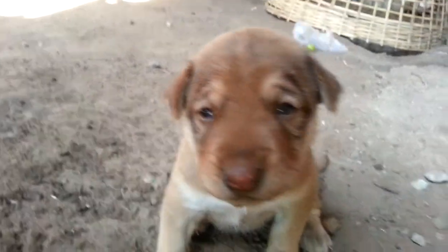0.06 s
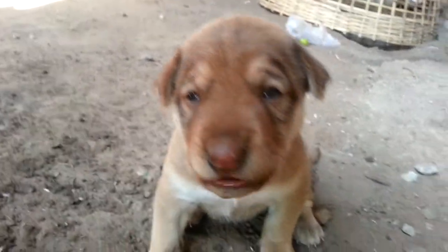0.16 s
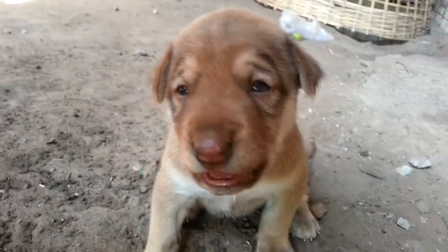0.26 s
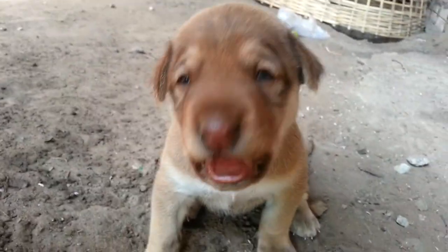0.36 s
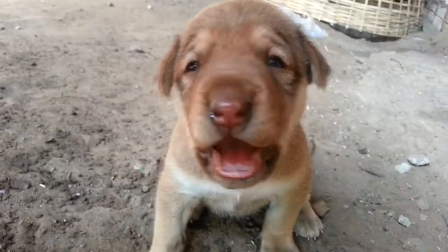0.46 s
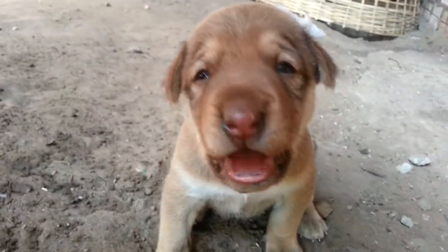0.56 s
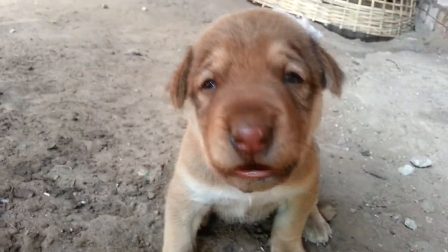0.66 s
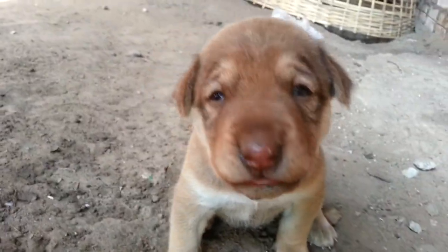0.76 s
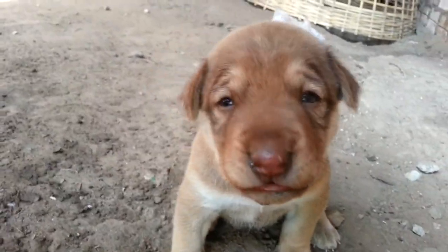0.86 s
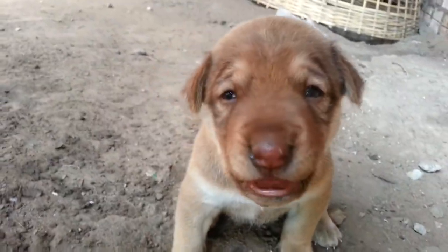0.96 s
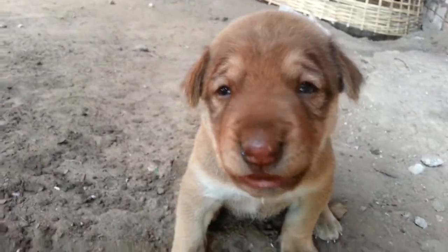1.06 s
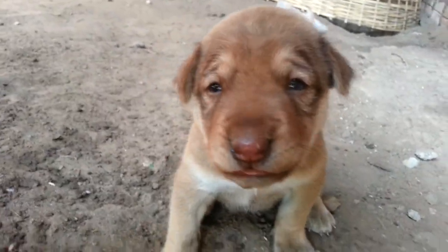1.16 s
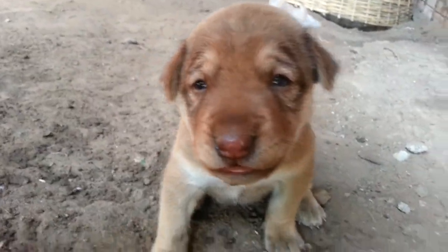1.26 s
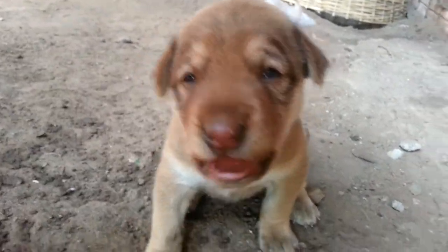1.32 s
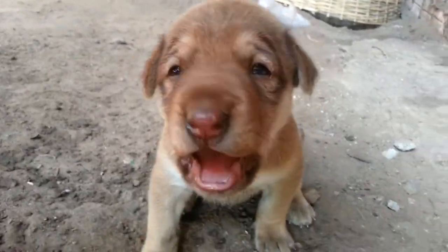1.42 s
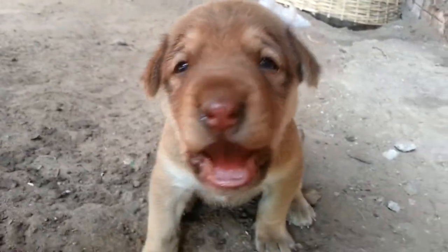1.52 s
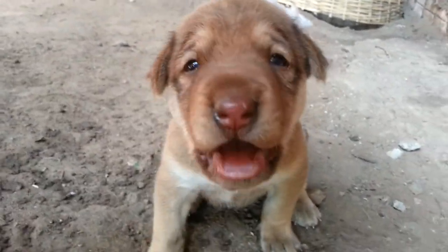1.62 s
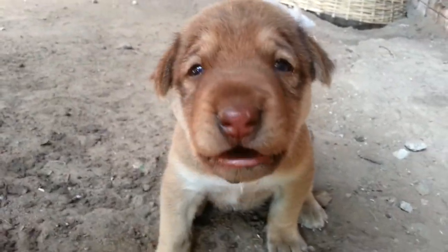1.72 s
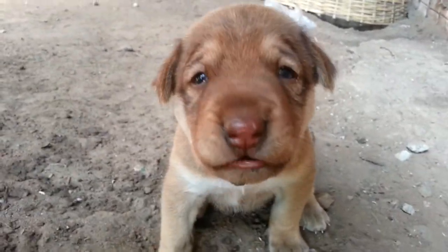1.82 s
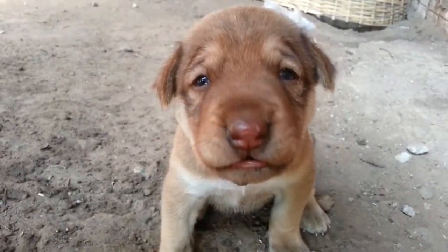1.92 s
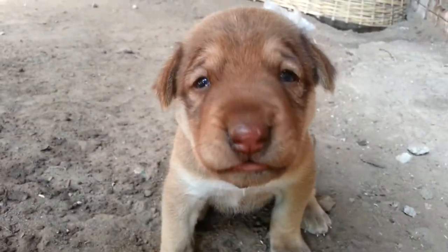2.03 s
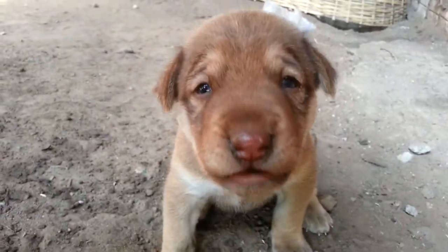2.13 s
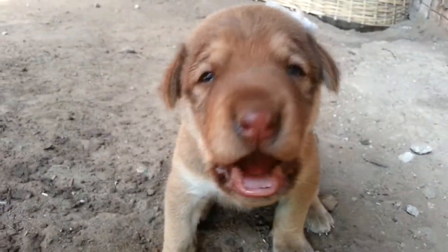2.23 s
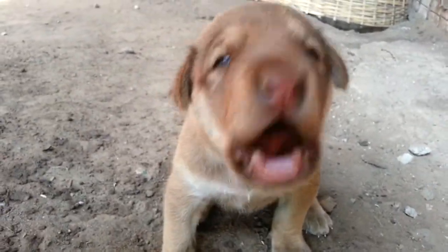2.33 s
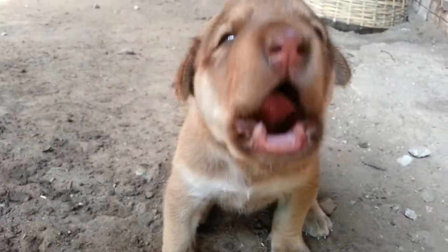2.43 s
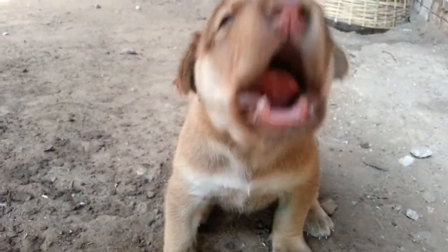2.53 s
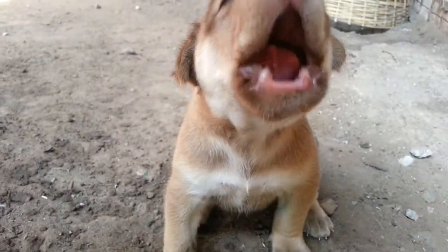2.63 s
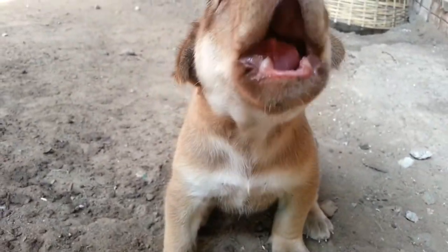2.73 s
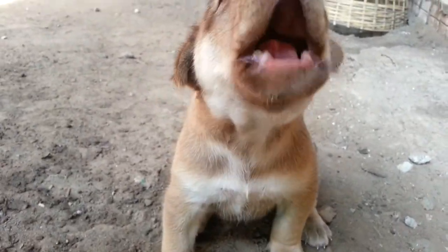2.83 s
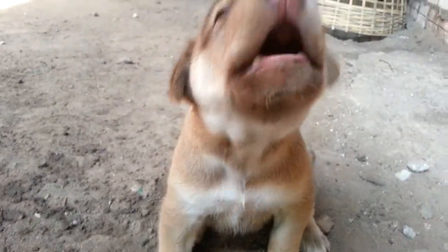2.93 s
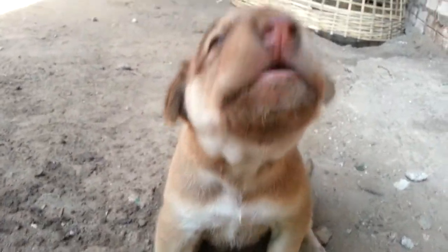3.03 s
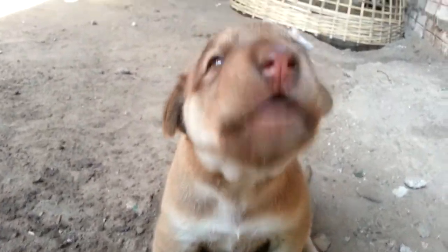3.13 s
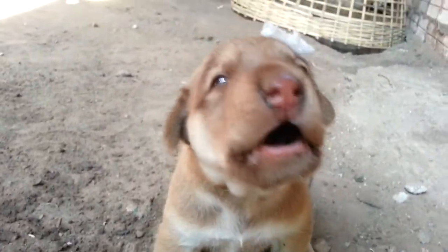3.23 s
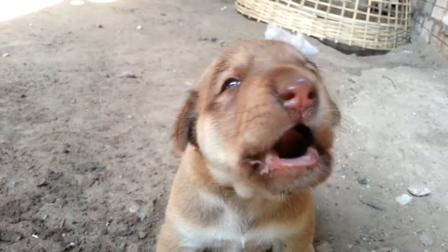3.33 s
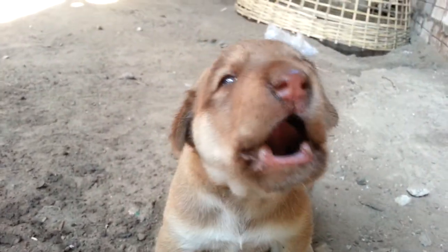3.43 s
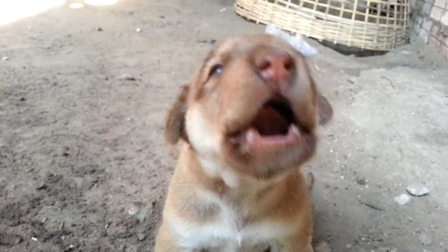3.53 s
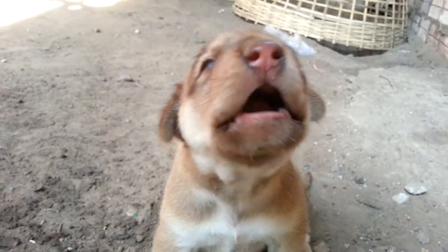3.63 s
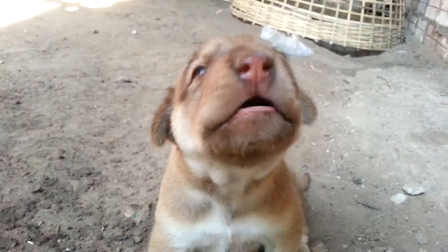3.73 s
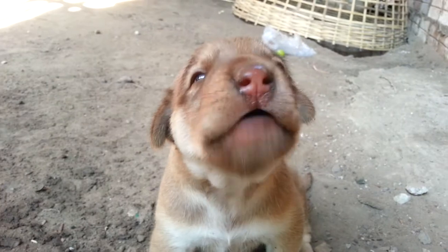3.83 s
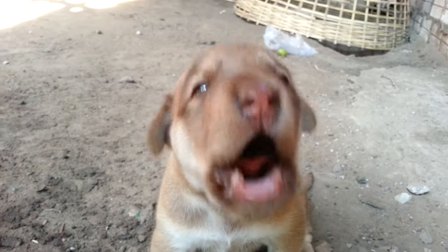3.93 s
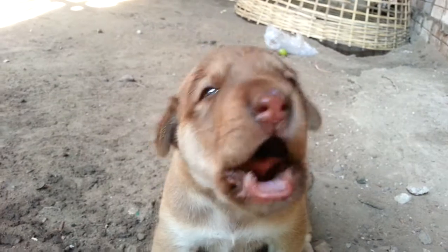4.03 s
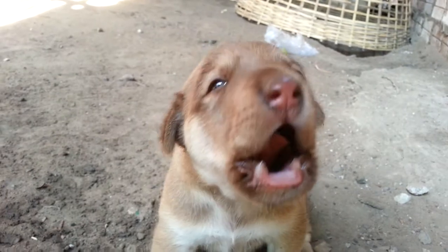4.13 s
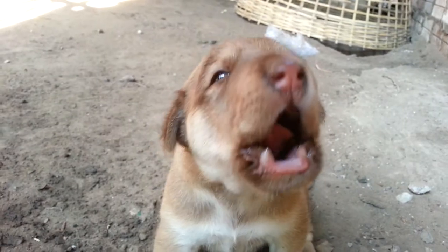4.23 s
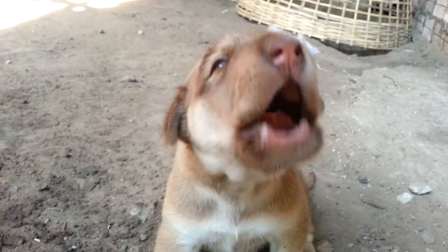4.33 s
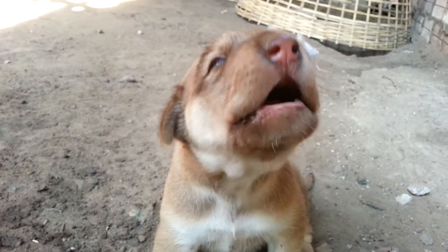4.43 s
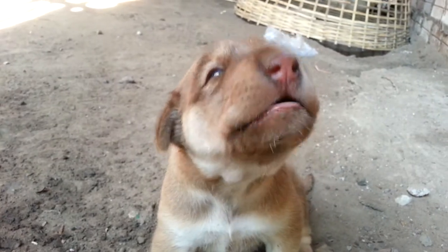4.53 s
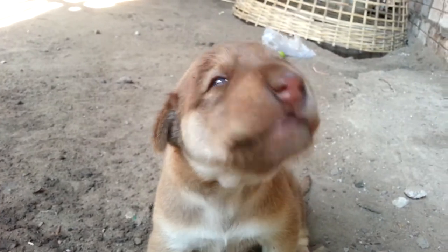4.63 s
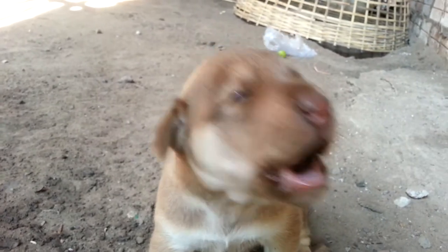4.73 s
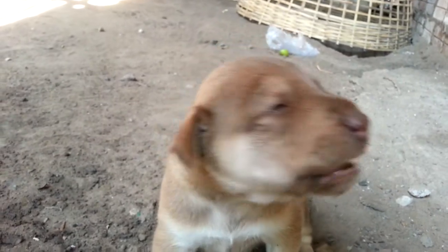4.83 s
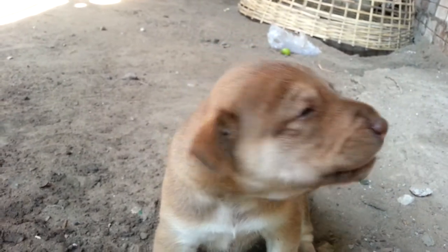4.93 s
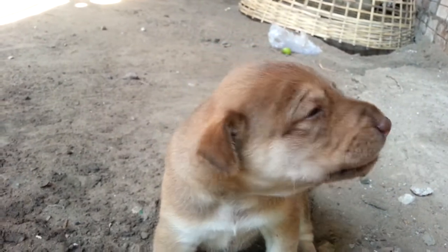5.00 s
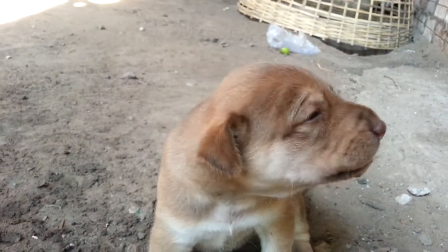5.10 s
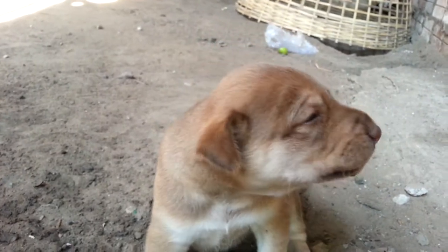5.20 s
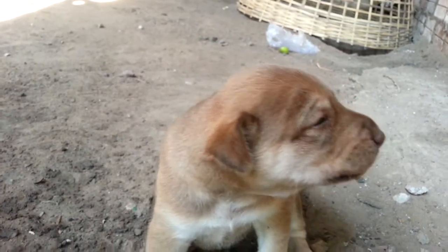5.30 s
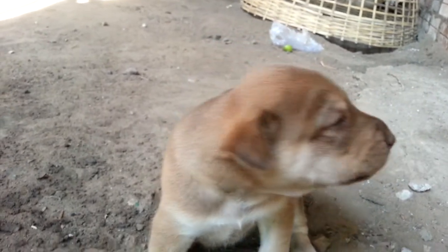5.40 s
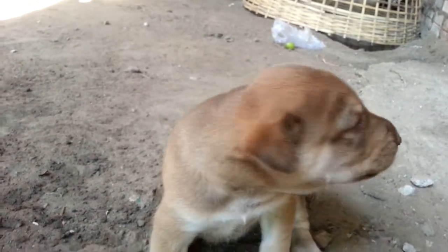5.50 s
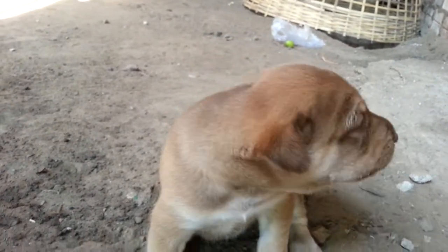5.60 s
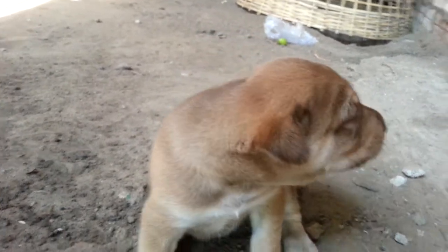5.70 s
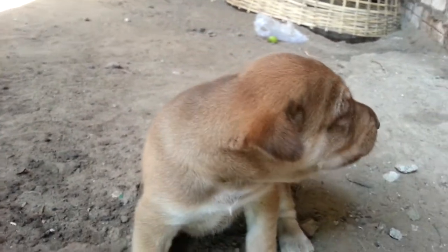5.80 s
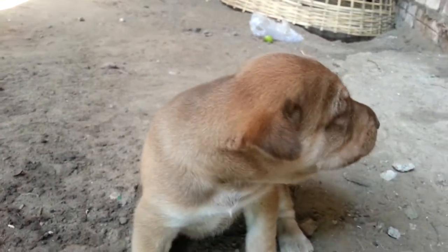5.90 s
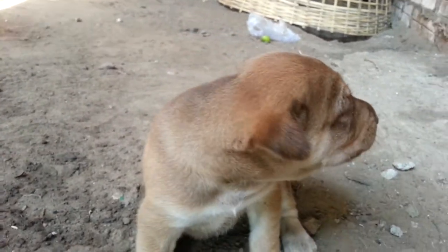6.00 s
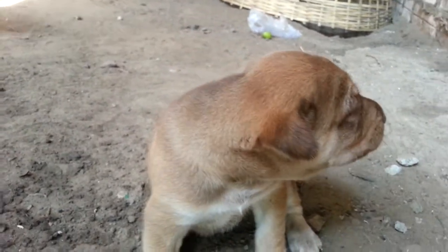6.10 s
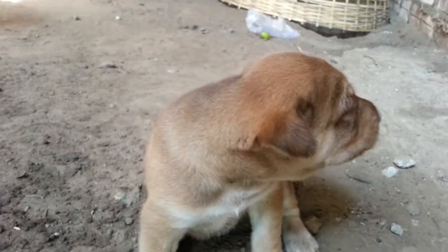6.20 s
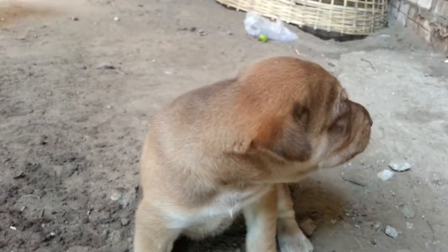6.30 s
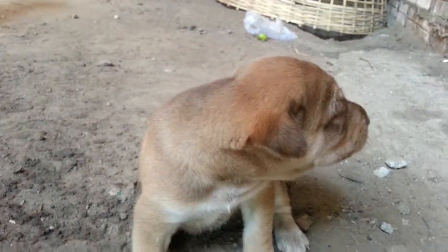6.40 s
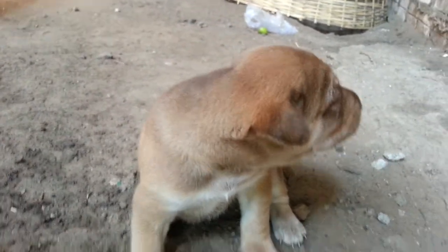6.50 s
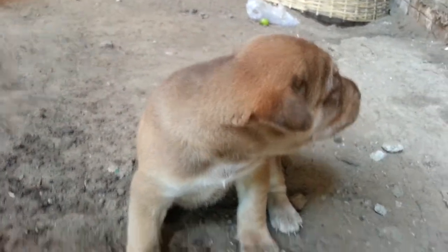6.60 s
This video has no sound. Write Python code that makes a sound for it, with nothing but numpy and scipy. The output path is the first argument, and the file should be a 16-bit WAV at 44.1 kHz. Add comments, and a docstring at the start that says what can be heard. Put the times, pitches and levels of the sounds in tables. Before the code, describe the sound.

A steady airy hiss and a thin, far-off machine whine run throughout, in a small walled yard. Close to the stereo microphone a young puppy begins crying at 0.2 s: a wobbling yelp that rises, cracks and trembles until 0.7. A short lower yip comes at 1.0, then a sharp squeal at 1.4 that jumps high and sags, rough and quivering, to 1.8. At 2.2 a loud piercing yelp stretches into a high, nearly level howl until 3.0. A lower, nasal, slightly trembling whine follows from 3.2 to 3.7. At 3.9 a strident yelp leaps up, drops, and climbs again to 4.5; a quick falling yelp at 4.7 ends by 5.0. Loud attacks distort, breath puffs thump the microphone, and faint echoes trail each cry. Then quiet hiss and whine, with one tiny low closed-mouth grunt near 5.5, until about 6.5.

```python
"""Under the hiss of the air in a walled yard a machine whines far away, from start to end.
Close to a two-port microphone a puppy yelps and howls seven times: fold pulses and breath ring in chest,
mouth, throat and head. The walls answer with sparse echoes, puffs of its breath rumble on the ports and
the loud starts overload the recorder. Last comes a tiny grunt, a few low closed-mouth cycles."""
import sys
import numpy as np
from scipy import signal
from scipy.fft import rfft, irfft, next_fast_len
from scipy.io import wavfile
from scipy.ndimage import uniform_filter1d

SR = 44100
rng = np.random.default_rng(int(sys.argv[2]) if len(sys.argv) > 2 else 0)


def generate_wav(signal):
    """Clip the signal to [-1, 1] and save it as 16-bit WAV at the path in sys.argv[1]."""
    frames = np.transpose(np.atleast_2d(signal))
    scaled = np.clip(frames, -1, 1) * 32767
    pcm = np.round(scaled).astype(np.int16)
    wavfile.write(sys.argv[1], SR, pcm)


N = 293294


def amp(db):
    """Gain from dB."""
    return 10 ** (np.asarray(db) / 20)


def evened(x):
    """Scales to rms 1."""
    return x / np.sqrt(np.mean(x ** 2) + 1e-20)


def read(points, hz):
    """Value of a (Hz, value) table on a log-frequency axis."""
    f, value = np.transpose(points)
    return np.interp(np.log(hz + 1), np.log(f + 1), value)


def add(mix, s, sound):
    """Mixes a sound in at s seconds."""
    part = mix[..., round(s * SR):][..., :sound.shape[-1]]
    part += sound[..., :part.shape[-1]]


def resonate(x, hz, width):
    """Shifts the curve hz down to zero, smooths, and shifts back: a resonance of gain 1."""
    turn = np.exp(2j * np.pi * np.cumsum(hz * np.ones(len(x))) / SR)
    r = np.exp(-np.pi * width / SR)
    return 2 * (turn * signal.lfilter([1 - r], [1, -r], x / turn)).real


def steep(x, hz, width):
    """A resonance with steep skirts, from four stages of which width is the narrowest."""
    for wider in (1, 2, 2.5, 3):
        x = resonate(x, hz, wider * width)
    return x


def air():
    """Hiss of the air: random short-time spectra with faint drifting patches, partly alike at both ports."""
    # Colour of the hiss. Each row: frequency in Hz, relative level in dB per Hz.
    colour = [(18, -85.5), (30, -90), (151, 1.5), (516, -11), (573, -11), (687, -13), (1350, -9.5),
              (1460, -7.5), (1630, -16), (2060, -3), (2960, -20.5), (3290, -11.5), (5840, -27),
              (13800, -25.5), (15300, -43.5)]
    # Likeness of the two ports. Each row: frequency in Hz, left-right correlation from -1 to 1.
    likeness = [(60, 0.64), (180, 0.96), (540, 0.4), (1640, -0.091), (4940, 0.022), (14900, -0.047)]
    # Balance of the two ports. Each row: frequency in Hz, left over right in dB.
    balance = [(60, 4), (150, 0), (380, 2.5), (950, -3), (2370, -2), (5940, 7.5), (14900, -3.5)]
    level_db = -45
    frames, hz = N // 256 + 5, np.fft.rfftfreq(1024, 1 / SR)
    a, b, c, d, patches = rng.standard_normal((frames, 513, 5)).T
    patches = uniform_filter1d(patches, size=10, axis=0)
    patches = evened(uniform_filter1d(patches, size=14, axis=1))
    same = np.clip(read(likeness, hz), -1, 1)[:, None]
    left = a + 1j * b
    right = same * left + np.sqrt(1 - same ** 2) * (c + 1j * d)
    spectra = np.array([left, right]) * amp(read(colour, hz)[:, None] + 0.5 * patches)
    lean = amp(read(balance, hz) / 2)[:, None]
    hiss = signal.istft(spectra * [lean, 1 / lean], nperseg=1024, noverlap=768)[1][:, :N]
    return amp(level_db) * evened(hiss)


def machine():
    """Whine of the far machine: noise through narrow resonances, separate noise at each port."""
    # Fuzzy lines. Each row: frequency in Hz, width of the narrower of two stages in Hz, level in dB.
    lines = [(1484, 8, -58), (1912, 12, -53), (2090, 12, -54), (2596, 16, -63), (3290, 100, -58),
             (4270, 14, -69)]

    def whine(noise):
        return sum(amp(db) * evened(resonate(resonate(noise, hz, width), hz, 2 * width))
                   for hz, width, db in lines)

    return np.array([whine(noise) for noise in rng.standard_normal((2, N))])


def tremble(t):
    """Pitch change in % from the trembling stretches, each fading in and out."""
    # Each row: first crest in seconds, end in seconds, rate in Hz, pitch depth in %.
    stretches = [(0.365, 0.409, 74, 4), (0.504, 0.573, 21.7, 5.8), (.588, 0.718, 22, 4.5),
                 (1.46, 1.537, 23.5, 6.24), (1.541, 1.637, 22.5, 6), (2.4, 2.425, 26.3, 10),
                 (3.424, 3.73, 25, 1.65), (4.048, 4.178, 19.8, 1.7), (4.224, 4.293, 18, 1.9)]
    snap = 1.5  # how abruptly a tremble flips between its high and low side
    first, end, rate_hz, depth = np.transpose(stretches)
    t = t[:, None]
    fade = np.clip(np.minimum((t - first) * rate_hz * 2 + 1, (end - t) * rate_hz * 2), 0, 1)
    wave = np.tanh(snap * np.cos(2 * np.pi * rate_hz * (t - first))) / np.tanh(snap)
    return (fade * wave) @ depth


ONSET_S, ENDING_S = .04, .025  # rough, breathy ends of every cry


def folds(t, hz):
    """One sharp pulse per turn; where the folds falter, pulses alternate, scatter and nearly fail."""
    # Unsteady folds. Each row: start in seconds, end in seconds, strong-weak share, scatter of pulse size
    # (about its rms share), share of pulses that nearly fail.
    rough = [(.36, .44, .04, .08, 0), (1.43, 1.475, .25, .2, 0), (1.635, 1.665, .7, .3, .1),
             (1.665, 1.74, .5, .6, .4), (2.262, 2.284, .3, .5, .1), (2.284, 2.325, .13, .1, 0),
             (3.965, 4.02, .2, .4, .05), (4.775, 4.82, .1, .25, 0)]
    # the same three shares at both ends of every cry
    ends = [(t[0], t[0] + ONSET_S, 0, .1, 0), (t[-1] - ENDING_S, t[-1], .15, .22, .05)]
    turns = np.cumsum(hz) / SR
    start = np.flatnonzero(np.diff(np.floor(turns))) + 1
    late = (turns[start] % 1) * SR / hz[start]  # part of a sample, so the pulses sit between samples
    count = len(start)
    chance, size, slip = rng.random((count, 3)).T, np.ones(count), np.zeros(count, int)
    for t0, t1, alternate, scatter, fail in ends + rough:
        inside = (t[start] >= t0) & (t[start] < t1)
        varied = 1 + alternate * (-1) ** np.arange(count)
        varied = varied * (1 + scatter * 3.14 * (chance[0] - .5))
        size = np.where(inside, varied * np.where(chance[1] < fail, .3, 1), size)
        slip[inside] = (scatter ** 2 * chance[2] * SR / hz[start])[inside]  # uneven pulses also come late
    lag, out = np.arange(-12, 13), np.zeros(len(t) + 99)
    x = lag + late[:, None]
    shape = np.sinc(.8 * x) * (1 + np.cos(np.pi * x / 13))
    np.add.at(out, (start + slip)[:, None] + lag + 12, size[:, None] * shape)
    return out[12:][:len(t)] * np.sqrt(SR / hz) / 2, turns


def head(drive, hiss, pose_db):
    """Treble resonances of the head, of alternating sign, each with its own random slow change of level."""
    # Each row: frequency in Hz, width of the narrowest stage in Hz.
    modes = [(3800, 596), (4800, 630), (6900, 1470), (9200, 1270), (11700, 1540)]
    drift = uniform_filter1d(rng.standard_normal((len(modes), len(drive))), size=2000)
    drift_db = 4.5 * evened(uniform_filter1d(drift, size=1200))
    source = drive + 0.044 * hiss
    return sum((-1) ** k * amp(pose_db[k] + drift_db[k]) * steep(source, *mode)
               for k, mode in enumerate(modes))


def catches(t):
    """Level change in dB where the voice catches for an instant, a smooth bump each time."""
    # Each row: middle in seconds, level change in dB.
    moments = [(.213, -5), (.291, -1.5), (.379, -7.5), (0.428, -6), (.556, -7), (0.588, -4), (1.505, -3),
               (2.338, 1), (2.364, -2), (2.402, -6), (2.4327, -1.5), (2.464, -8), (3.497, -3),
               (4.223, -0.5), (4.879, -5)]
    at, change_db = np.transpose(moments)
    return np.exp(-.5 * ((t[:, None] - at) / 0.0046) ** 2) @ change_db  # 4.6 ms: standard deviation


def cry(rows, lift_db, stretch, pose_db):
    """Fold pulses and breath pass chest, mouth, throat and head."""
    # resonances: Hz, width of the narrowest stage in Hz
    chest, mouth, throat = (866, 684), (1985, 509), (2910, 482)
    breath_base, breath_ends = .11, .35  # the breath's gain is the square of their sum
    tremble_db = 0.1543  # level change for each % of pitch
    ring = 0.34  # share of the swell kept when a harmonic crosses the mouth resonance
    s, hz, *columns = np.transpose(rows)
    t = np.arange(s[0], s[-1], 1 / SR)
    level_db, opening, throat_db = (np.interp(t, s, c) for c in columns)
    hz = uniform_filter1d(np.exp(np.interp(t, s, np.log(hz))), size=220, mode="nearest")

    # The chest fades by 18 dB an octave and as the level rises; the treble follows the upper voice.
    chest_db = lift_db - 17 - 18 * np.log2(hz / 550) - 0.76 * (level_db + 4.5)
    treble_db = -19 + 0.44 * throat_db
    both_ends = np.exp((s[0] - t) / ONSET_S) + np.exp((t - s[-1]) / ENDING_S)
    breath = breath_base + breath_ends * both_ends

    shake = tremble(t)
    level_db = level_db + catches(t) + tremble_db * shake
    jitter = evened(uniform_filter1d(rng.standard_normal(len(t)), size=120))
    waver = uniform_filter1d(rng.standard_normal(len(t)), size=900)
    waver = evened(uniform_filter1d(waver, size=600))  # slow wandering of the pitch
    hz = hz * np.exp(shake / 100) * (1 + .002 * jitter) * (1 + .004 * waver)

    pulses, turns = folds(t, hz)
    # air leaks while the folds are open
    hiss = (.4 + np.exp(-(turns % 1) / .3)) * rng.standard_normal(len(t))
    drive = pulses + breath ** 2 * hiss
    upper = amp(throat_db) * steep(drive, stretch * throat[0], throat[1])
    treble = amp(treble_db) * head(drive, hiss, pose_db)
    body = amp(chest_db) * steep(drive, *chest)
    voice = steep(drive, mouth[0] * opening, mouth[1]) - body - upper + treble
    voice = signal.sosfilt(signal.butter(2, 280, "high", fs=SR, output="sos"), voice)

    # Even out the loudness, then give back a share of its swell.
    power = signal.oaconvolve(voice ** 2, np.hanning(601) / 300, "same")
    loudness = np.sqrt(power.clip(1e-6))
    swell = (loudness / uniform_filter1d(loudness, size=2600)) ** ring
    fade = signal.windows.tukey(len(t), 400 / len(t))
    return amp(level_db) * swell * voice / loudness * fade


def ports(x):
    """The two ports hear the head with their own colour and phase."""
    # Balance of the voice. Each row: frequency in Hz, left over right in dB.
    balance = [(60, 16.5), (110, 15), (200, 15.5), (380, -15), (700, 0.5), (1280, -9), (2370, -9),
               (4370, 2.5), (8070, 3), (14900, 8.5)]
    # Phase of the voice. Each row: frequency in Hz, left ahead of right in radians.
    phase = [(0, -4.8), (3190, 1.16), (4050, 0.87), (7670, -1), (10300, 3), (13500, -10), (13900, 0.5),
             (15100, -0.5)]
    size = next_fast_len(N)
    hz = np.fft.rfftfreq(size, 1 / SR)
    half = amp(read(balance, hz) / 2) * np.exp(.5j * read(phase, hz))
    pair = np.array([half, 1 / half])
    pair = pair / abs(pair.mean(0)).clip(.6)
    return irfft(rfft(x, size) * pair, size)[:, :N]


def yard(x):
    """Walls: sparse taps of random sign, one in every 20 samples, each band dying at its own speed."""
    # Each row: frequency in Hz, time to die by 60 dB in seconds.
    decay = [(200, 0.6), (800, 0.4), (1700, 0.55), (4500, 0.33), (9000, 0.25)]
    level_db = -22
    taps = np.zeros((2, SR))
    at = np.arange(500, SR - 20, 20) + rng.integers(0, 20, (2, (SR - 501) // 20))
    np.put_along_axis(taps, at, rng.choice([-1., 1.], at.shape), 1)
    hz, t, spectra = signal.stft(taps, SR, nperseg=256)
    dying = amp(-60 * t / read(decay, hz)[:, None])
    tail = signal.istft(spectra * dying, SR, nperseg=256)[1]
    return amp(level_db) * signal.fftconvolve(x, tail / np.linalg.norm(tail[0]), axes=1)[:, :N]


def puffs():
    """Air from the mouth buffets the ports: lumpy rumble, stronger at the right, that rises, holds and dies."""
    # Each row: start of the hold in seconds, level in dB, hold in seconds.
    gusts = [(.25, -54, .02), (0.4, -28, .03), (1.017, -34, 0.027), (1.405, -3, 0.013), (2.27, -14, 0.015),
             (2.493, -42, 0.022), (3.245, -47, 0.031), (3.96, -14, .03), (4.325, -78, .01),
             (4.77, -15.5, 0.014)]
    rise, fall = 911.5, 364.5  # dB a second
    lean_db = -2.5  # added at the left port, taken off at the right
    noise = rng.standard_normal((3, N))
    noise = noise[:2] + 4.3 * noise[2]  # mostly alike at both ports
    noise = signal.sosfilt(signal.butter(2, 70, fs=SR, output="sos"), noise)
    t, (s, db, hold) = np.arange(N)[:, None] / SR, np.transpose(gusts)
    level_db = (db - rise * (s - t).clip(0) - fall * (t - s - hold).clip(0)).max(1)
    return evened(noise) * amp(level_db) * amp([[lean_db], [-lean_db]])


def grunt():
    """A few low closed-mouth cycles of falling pitch, ringing at the pitch and in the nose."""
    length, start_hz, level_db = .033, 275, -35  # s, Hz, dB before the fade
    nose_hz, nose_db = 750, -5
    t = np.arange(0, length, 1 / SR)
    turns = start_hz * t * (1 - 2.5 * t)
    pulses = sum(np.cos(2 * np.pi * k * turns) for k in range(1, 4))
    sound = resonate(pulses, start_hz, 140) + amp(nose_db) * resonate(pulses, nose_hz, 350)
    return amp(level_db) * evened(sound) * np.sin(np.pi * t / length) ** .5


def scene():
    """The puppy close by, its echo from the walls, its puffs on the ports, the air and the far machine."""
    # One table a cry. Each row: time in seconds, pitch in Hz, level in dB, mouth opening as a factor on
    # its resonance, level of the upper voice (the throat resonance) in dB.
    cries = [
        [(0.192, 313, -30, 1.0, -38), (0.226, 500, -7, 0.62, -11.5), (0.274, 538.7, -4, 0.79, -27),
         (0.295, 505.6, -18, 0.68, -30), (0.335, 385.4, -14.5, 0.87, -41), (0.37, 424.4, -7, 0.86, -10.5),
         (0.41, 548, -3, 0.81, -3), (0.45, 825.4, -4.5, 0.8, 1), (0.49, 862.5, -8, 0.9, 3.5),
         (0.508, 945, -10, 0.79, -17), (0.545, 795, -9, 0.94, -16.5), (0.565, 624, -13.5, 0.81, -19),
         (0.61, 551, -10.5, 0.86, -20), (0.69, 542, -13, 0.89, -19), (0.706, 558, -29, 1.0, -10),
         (0.727, 535, -18.5, 0.8, -4)],
        [(0.983, 354.5, -21, 0.86, -13), (1.02, 521, -1, 0.73, -27), (1.045, 604.6, -8, 0.82, -24.5),
         (1.07, 626, -12, 0.78, -29), (1.109, 564, -8, 0.82, -43), (1.163, 435.6, -16, 0.82, -25),
         (1.182, 455, -22, 0.94, -24)],
        [(1.378, 384, -18.5, 0.77, -9), (1.395, 523.4, 1, 0.75, -12.5), (1.431, 1085, -0.5, 0.77, -0.5),
         (1.458, 1208, -4.5, 0.82, 4), (1.521, 941, -9.5, 0.87, -27), (1.61, 839, -12, 0.94, -30),
         (1.664, 732, -15, 0.88, -21), (1.724, 773.5, -18, 0.78, -25), (1.742, 565, -14.5, 0.98, -29),
         (1.779, 730, -39, 1, -6.5)],
        [(2.23, 447, -5.5, 0.69, -9.5), (2.275, 1213, 5.5, 0.78, 2.5), (2.33, 1245, -9, 0.85, 3),
         (2.344, 1050, -8.5, 0.85, -3), (2.368, 1059, -8, 0.84, -8), (2.382, 856, -6.5, 0.94, -23),
         (2.428, 823, -6, 0.86, -40), (2.438, 989, -9, 0.85, -31), (2.46, 1010, -2.5, 0.83, -25.5),
         (2.473, 1319, -4.5, 0.76, -23), (2.517, 1306, -4, 0.71, -27), (2.568, 1234, -8.5, 0.83, -23.5),
         (2.604, 1258, -8.5, 0.86, -39), (2.676, 1137, -8.5, 0.8, -22), (2.861, 1159, -9, 0.81, -27),
         (2.921, 1151, -11.5, 0.81, -12), (2.938, 1119, -15.5, 0.83, -21), (2.961, 1156, -19.5, 0.75, -15),
         (2.968, 1022, -13, 0.69, -31), (2.979, 985, -16, 0.9, -35), (2.992, 866, -52, 0.85, -26.5)],
        [(3.206, 387, -30, 1.0, -19), (3.243, 563, -4, 0.64, -13.5), (3.265, 596.6, -2, 0.74, -10.5),
         (3.3, 608.6, -8.5, 0.76, -8.5), (3.32, 554, -10.5, 0.77, -18), (3.365, 465, -10, 0.7, -7),
         (3.45, 501.4, -7.5, 0.8, -31), (3.554, 537.2, -8.5, 0.76, -26), (3.63, 519, -8, 0.72, -31),
         (3.705, 525.3, -10, 0.72, -33.5), (3.73, 469, -21.5, 0.76, -23)],
        [(3.924, 360, -16.5, 1, -48), (3.94, 566, -7, 0.53, -12.5), (3.98, 1097, 7, 0.81, -5),
         (4.039, 977, -2.5, 0.88, -22.5), (4.069, 763, -10.5, 0.84, -39), (4.165, 587, -11, 0.83, -35),
         (4.204, 617.5, -5.5, 0.84, -50), (4.225, 666, -11, 0.72, -20), (4.315, 806.6, -5, 0.7, -63.5),
         (4.35, 824.4, -6.5, 0.76, -60), (4.4, 809.5, -12, 0.72, -41), (4.43, 734.5, -6.5, 0.68, -45),
         (4.461, 712, -15, 0.67, -31.5), (4.482, 613, -13, 0.85, -41.5), (4.499, 707, -36, 0.87, -1.5)],
        [(4.732, 317.4, -26.5, 1, -40.5), (4.765, 617, 1.5, 0.63, -8.5), (4.795, 950, 0.5, 0.7, -1.5),
         (4.815, 899.4, -3.5, 0.92, -4.5), (4.858, 690, -8.5, 0.84, -15), (4.897, 493.3, -8.5, 0.77, -42),
         (4.955, 419, -16, 0.73, -46), (4.972, 408, -13.5, 0.88, -28), (4.988, 370, -54, 0.84, -15)],
    ]
    # Pose of the head, one row a cry: left over right in dB, chest in dB, throat resonance as a factor,
    # then five columns with the level of each treble resonance in dB.
    poses = [(1.2, -6, 0.987, -1.5, 5.5, -13, -19, -27), (1.3, -8, 1, 5, 9.5, -8, -4.5, -25),
             (0.2, -0.5, 1.025, 6.5, 8, -7, -16, -26.5), (2.25, -6.5, 0.95, 0, -7, -11, -57, -13),
             (2.8, -7.5, 0.977, 0.5, -9, -9, -33, -22.5), (0.25, -4, 0.962, 3, -5.5, -4.5, -28, -18.5),
             (4.9, -7, 0.989, -22.5, 2.5, -5.5, -20, -25)]
    puppy = np.zeros((2, N))
    for rows, (turn_db, lift_db, stretch, *pose_db) in zip(cries, poses):
        sides = amp([[turn_db / 2], [-turn_db / 2]])
        add(puppy, rows[0][0], cry(rows, lift_db, stretch, pose_db) * sides)
    add(puppy, 5.468, grunt())
    puppy = ports(puppy)
    return puppy + yard(puppy) + puffs() + air() + machine()


def record(dry):
    """A loud sound turns the bass down for a while; hard clipping at full scale; then the band limit."""
    drive_db, edge_hz = -0.5, 14700
    bass_hz, duck, duck_from_db = 420, .5, -32  # duck: dB of bass lost per dB above duck_from_db
    recovery = 120  # fall of the held level, dB a second
    power = abs(uniform_filter1d((dry ** 2).mean(0), size=400))
    power_db = 10 * np.log10(power + 1e-12)
    fall = np.arange(N) * recovery / SR
    held_db = np.maximum.accumulate(power_db + fall) - fall
    over_db = uniform_filter1d(np.maximum(held_db - duck_from_db, 0), size=2000)
    bass = signal.sosfiltfilt(signal.butter(3, bass_hz, fs=SR, output="sos"), dry)
    ducked = dry - bass * (1 - amp(-duck * over_db))
    clipped = np.clip(amp(drive_db) * ducked, -1, 1)
    band = signal.firwin(255, edge_hz, window=("kaiser", 4), fs=SR)[None]
    return signal.oaconvolve(clipped, band, "same").clip(-1, 1)


dry = scene()
out = record(dry)
generate_wav(out)
```